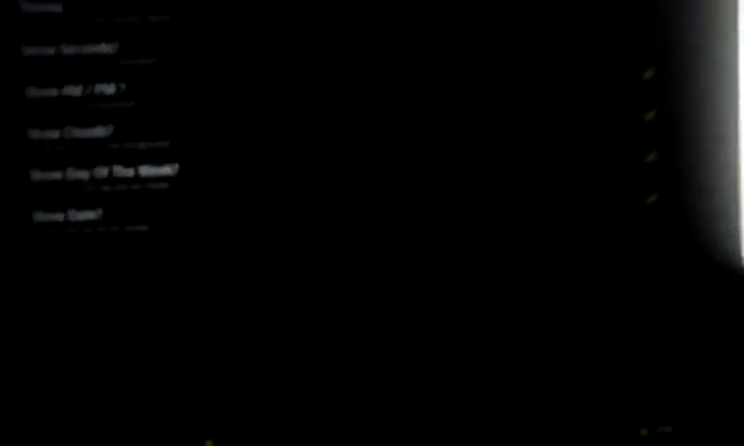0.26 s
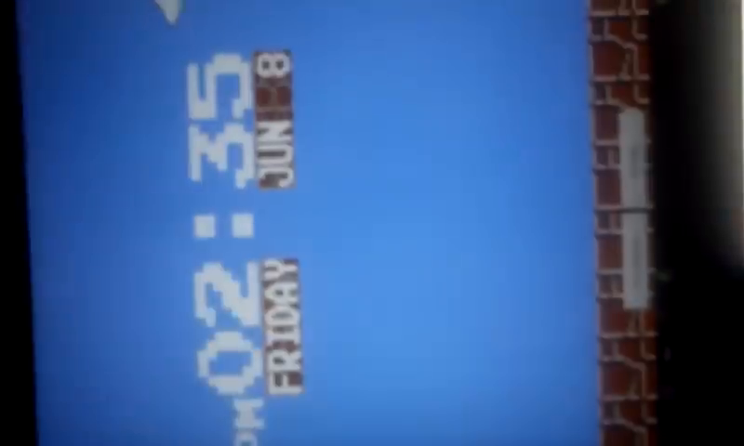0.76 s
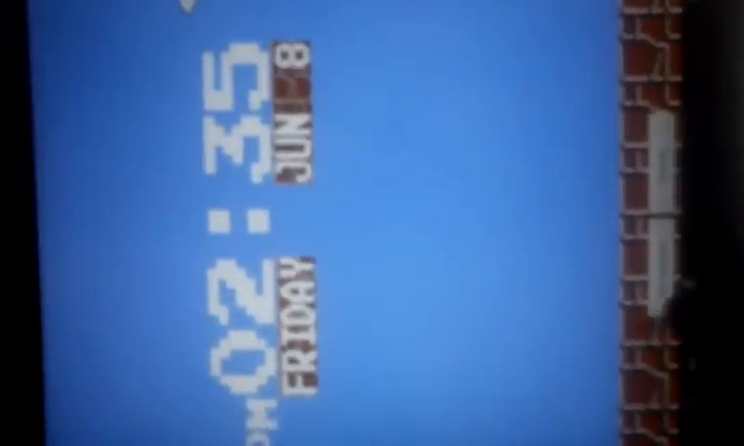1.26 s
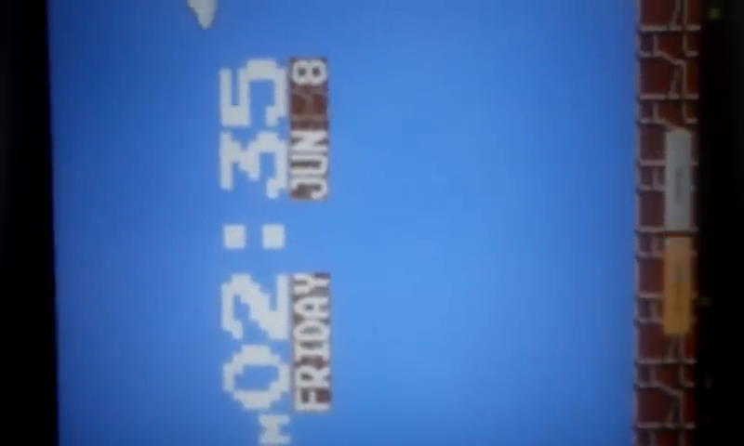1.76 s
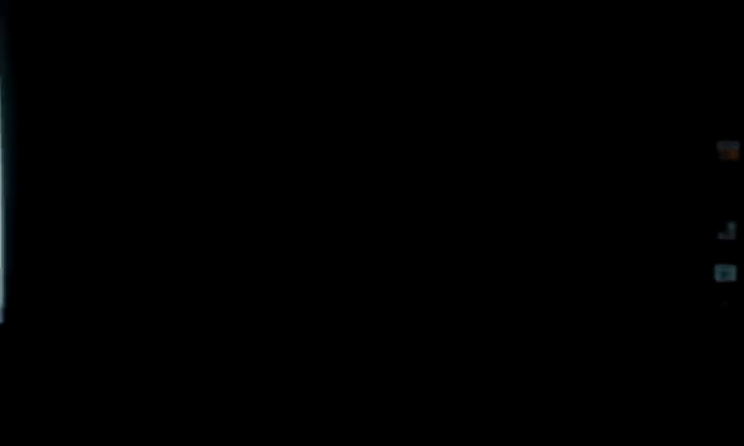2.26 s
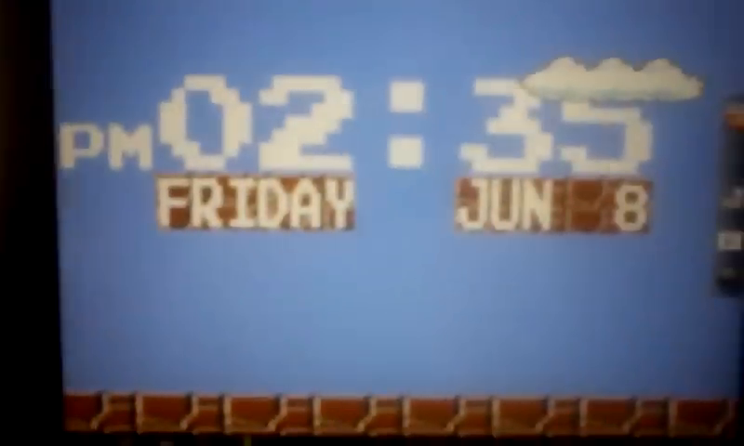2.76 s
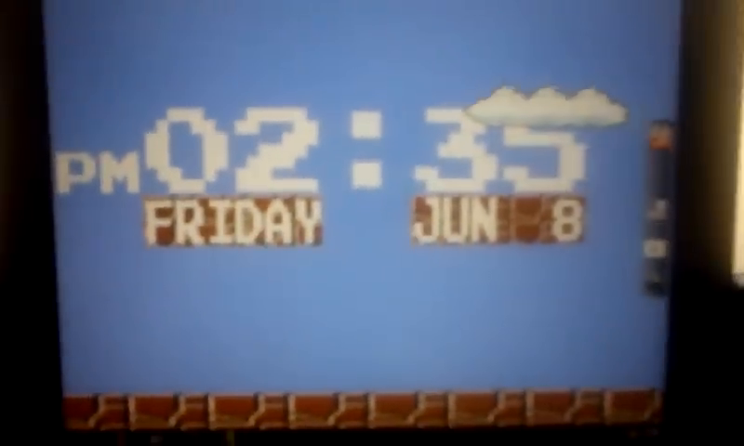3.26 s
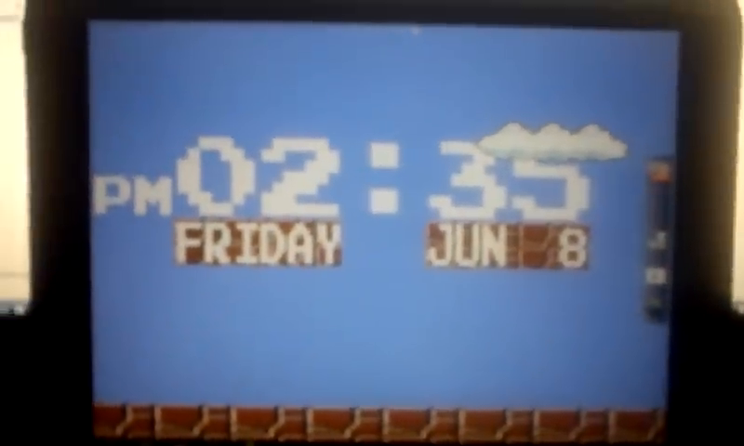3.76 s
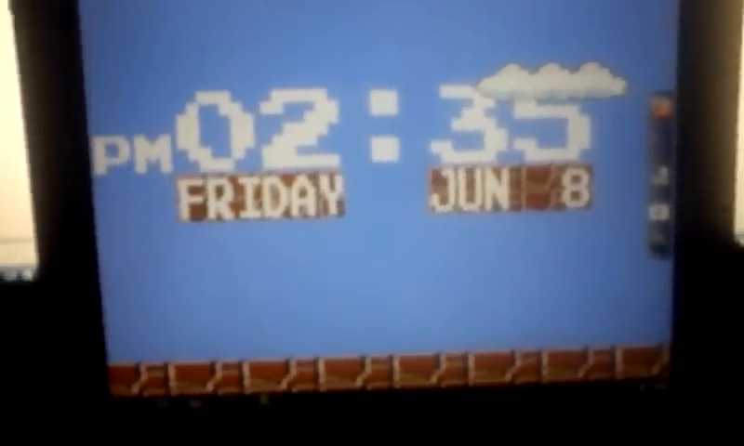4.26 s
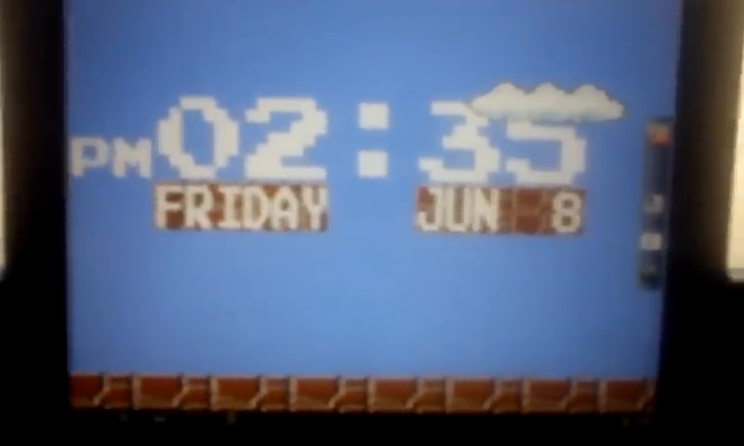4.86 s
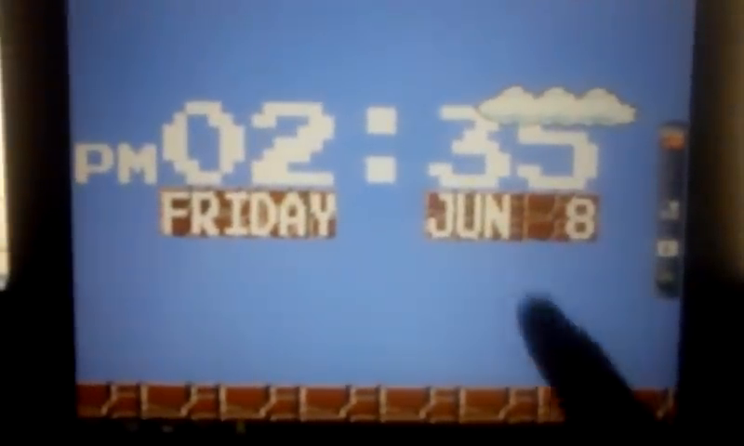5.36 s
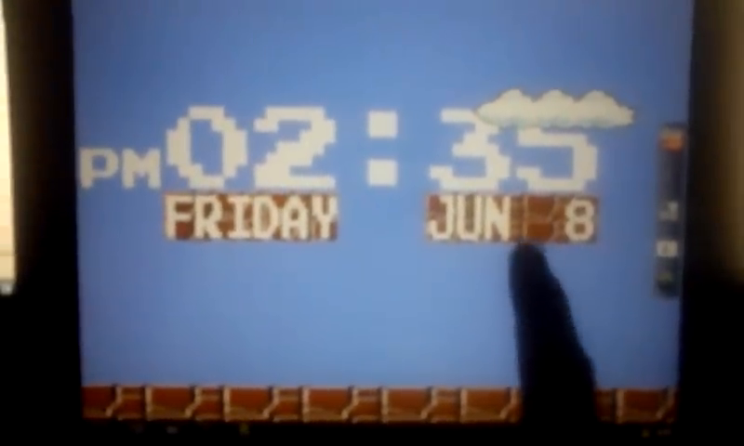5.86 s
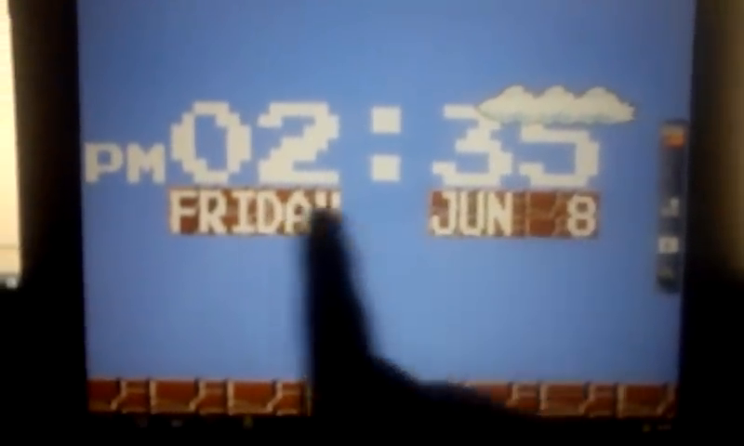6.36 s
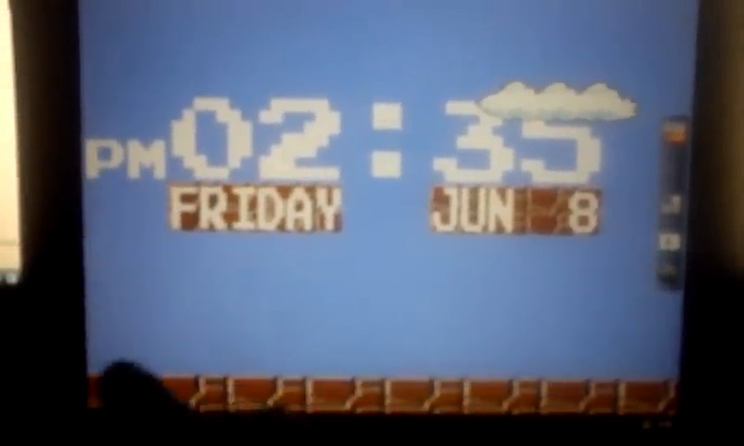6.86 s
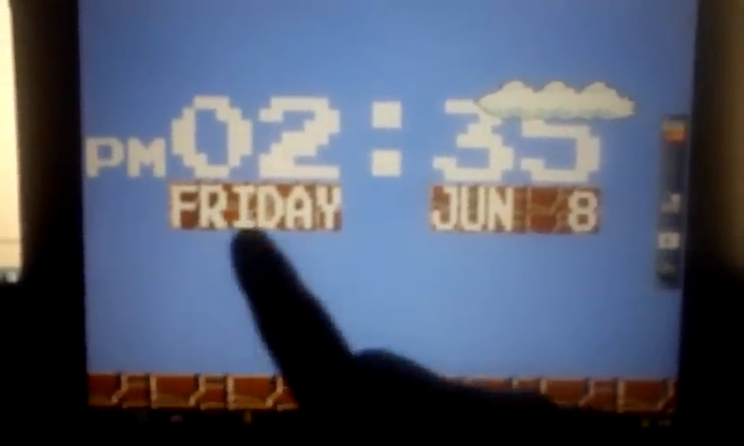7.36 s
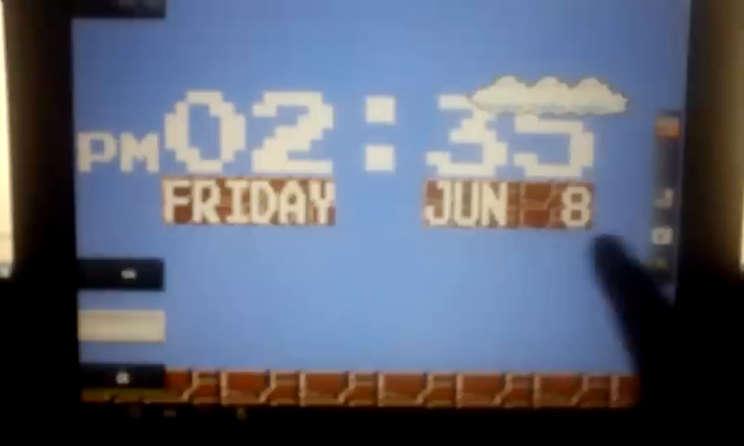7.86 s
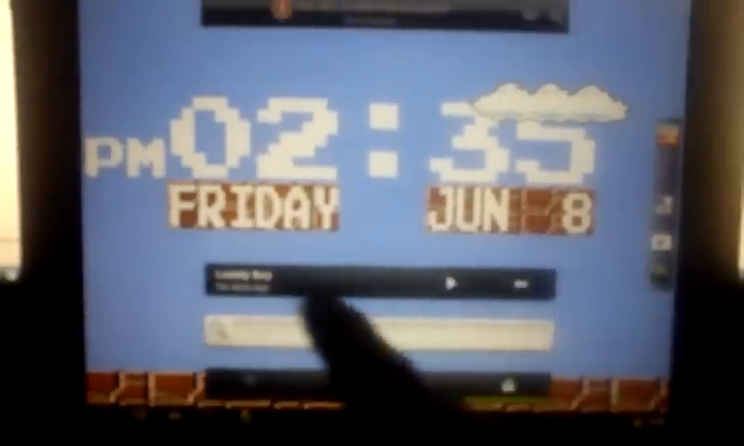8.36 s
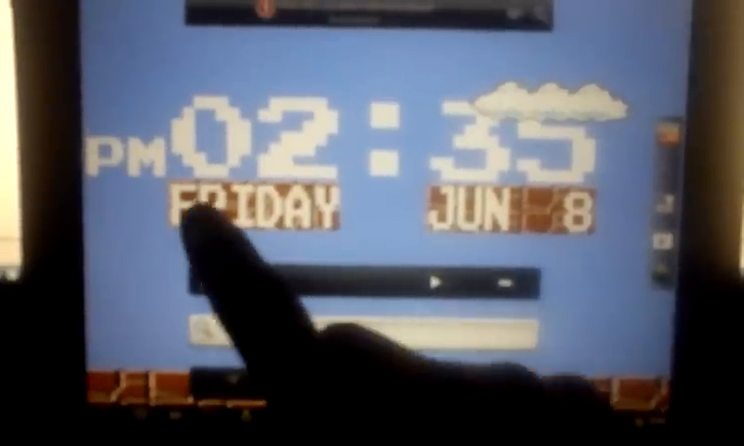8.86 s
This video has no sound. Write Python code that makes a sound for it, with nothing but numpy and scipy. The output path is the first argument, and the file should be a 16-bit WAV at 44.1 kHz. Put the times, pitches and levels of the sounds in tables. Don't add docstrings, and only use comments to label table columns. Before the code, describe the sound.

A heavy machine beyond the wall drones low and steady, slightly throbbing, with air rumble and faint hiss in a quiet room. Close to a small microphone, a hand lightly brushes plastic; around the middle the casing snaps sharply in a quick double click. Weak ticks, more rubbing and a dull tap follow. Very faint bird chirps come late. The treble is thin and slightly patchy.

```python
import sys
import numpy as np
from scipy import signal
from scipy.fft import rfft, irfft, next_fast_len
from scipy.io import wavfile
from scipy.ndimage import uniform_filter1d, map_coordinates

SR = 44100
rng = np.random.default_rng(int(sys.argv[2]) if len(sys.argv) > 2 else 0)


def attenuation_scalar(level_db):
    decades = np.asarray(level_db, float) / 20
    return 10 ** decades


def pcm_store(signal):
    levels = np.round(np.clip(np.atleast_2d(signal), -1, 1) * 32767)
    wavfile.write(sys.argv[1], SR, levels.astype(np.int16).T)


N = 402191


def unit(x):
    return x / np.sqrt(np.mean(x ** 2) + 1e-20)


def along(points, hz):
    f, v = np.transpose(points)
    return np.interp(np.log(hz + 1), np.log(f + 1), v)


def wobble(rate):
    return map_coordinates(rng.standard_normal(400), [np.arange(N) * min(rate, 40) / SR])


def filtered(x, response):
    m = next_fast_len(N + SR)
    return irfft(rfft(x, m) * response(np.fft.rfftfreq(m, 1 / SR)), m)[:N]


def modes(table):
    def response(f):
        return sum(attenuation_scalar(db) * 1j * f * width / (centre * centre - f * f + 1j * f * width)
                   for centre, width, db in table)
    return response


def noise(spectrum):
    return unit(filtered(rng.standard_normal(N), lambda hz: attenuation_scalar(along(spectrum, hz))))


def tone(hz, db):
    phase = 2 * np.pi * (np.cumsum(hz) / SR + rng.random())
    return np.sqrt(2) * attenuation_scalar(db) * np.sin(phase)


def stroke(s, length, db, rise_db_per_s, fall_db_per_s):
    t = np.arange(N) / SR - s
    rise = rise_db_per_s * np.minimum(t, 0)
    fall = fall_db_per_s * np.maximum(t - length, 0)
    return attenuation_scalar(db + rise - fall)


def machine():
    # (time [s], frequency [Hz])
    speed = [(0, 181.5), (1.15, 179.7), (1.75, 181), (2.45, 179.3), (3, 180.3), (3.75, 180.6),
             (4.85, 178.2), (5.6, 178.9), (6.2, 179.9), (7, 178.7), (8, 178.2), (9.12, 178)]
    # (multiple of the cycle rate, level [dB rms], unsteadiness [dB])
    shaft_orders = [(2, -49, 1.5), (3, -48, 1), (4, -36, .4), (5, -60, 2), (6, -45, .6), (7, -61, 2),
                    (8, -65, 1.5), (12, -58, 2), (18, -60, 2), (24, -56, 1.5), (30, -68, 2), (36, -75, 2),
                    (42, -72, 2), (48, -69, 2), (54, -71, 2)]
    # (frequency [Hz], level [dB rms], unsteadiness [dB])
    steady = [(13.5, -58, 1.5), (38.4, -52.5, 1.2), (149.1, -54, 2.5), (463.6, -67.5, 1.5), (15607, -90, 2)]
    blade_per_cycle = 24.435
    blade_db, drift_db = -43, .6
    belt_hz, belt_depth = 3.4, .11

    knot_s, knot_hz = np.transpose(speed)
    blade_hz = np.interp(np.arange(N) / SR, knot_s, knot_hz)
    hunting = 1 + 0.00294 * wobble(3.5)
    turn = 2 * np.pi * np.cumsum(blade_hz / blade_per_cycle * hunting) / SR
    orders = np.zeros(N)
    for k, db, shake in shaft_orders:
        gain = np.sqrt(2) * attenuation_scalar(db + shake * wobble(3.7))
        orders -= gain * np.cos(k * turn - k % 2 * np.pi / 2)

    belt = 1 + belt_depth * tone(belt_hz * (1 + .15 * wobble(1.2)), 2 * wobble(1.5))
    blade = belt * tone(blade_hz + .5 * wobble(10), blade_db + drift_db * wobble(4.5))
    steady_lines = sum(tone(hz * (1 + .002 * wobble(1.6)), db + shake * wobble(2.3)) for hz, db, shake in steady)
    return orders + blade + steady_lines


def casing():
    # (time [s], level [dB], part struck, rattle [0-1], rattle t60 [s], contact time [ms])
    ticks = [
        (3.5467, 1, "catch", .04, .004, .12),
        (3.5629, -16, "joint", .2, .003, .12),
        (3.5779, -15, "joint", .4, .005, .14),
        (3.59346, 1, "shell", .1, .004, .11),
        (4.49745, -16, "key", .04, .002, .18),
        (4.57435, -12.5, "key", .05, .002, .15),
        (6.4668, -21, "key", .04, .002, .6),
        (6.6088, -2.5, "pad", .01, .002, 1.2),
    ]
    parts = {"catch": [(900, 900, -10), (3000, 1500, -1), (8600, 2500, -9)], "joint": [(3800, 1200, -7),
             (5700, 1100, 0), (9600, 1400, -4), (14500, 1500, -5)], "shell": [(1250, 300, 3),
             (2400, 800, 3), (3600, 700, 6), (5800, 1300, 6), (9400, 700, 11), (12100, 1000, 3)],
             "key": [(900, 230, 9), (2450, 800, -1.5), (9500, 1500, -1)], "pad": [(480, 300, 1),
             (800, 300, -5)]}
    creak_s, creak_hold_s, creak_db = 3.568, .021, -33.5
    settle_s = 3.596
    strain_db_per_s, catch_db_per_s = 1400, 4500
    radiates_hz = 1700

    blows = {part: np.zeros(N) for part in parts}
    slips = rng.standard_normal(N) * attenuation_scalar(1.5 * rng.exponential(size=N))
    strain = stroke(creak_s, creak_hold_s, creak_db, strain_db_per_s, catch_db_per_s)
    strain += stroke(settle_s, 0, creak_db - 3, catch_db_per_s, catch_db_per_s)
    blows["joint"] += strain * np.convolve(unit(slips), [.25, .5, .25], "same")

    t = np.arange(200) / SR
    for s, db, part, rattle, t60, contact_ms in ticks:
        rebounds = rattle * rng.standard_normal(len(t)) * attenuation_scalar(-60 * t / t60)
        rebounds[0] = 1 if part in ("key", "pad") else -1
        touch = np.hanning(round(contact_ms * SR / 1000) + 2)
        blow = np.convolve(rebounds, touch / touch.sum())[:len(t)]
        blows[part][round(s * SR):][:len(t)] += attenuation_scalar(db) * blow
    blows["shell"] = filtered(blows["shell"], lambda f: (1j * f / (radiates_hz + 1j * f)) ** 2)
    return sum(filtered(blows[part], modes(parts[part])) for part in parts)


def hand():
    # (time [s], length [s], level [dB])
    strokes = [(1.006, 0.031, -68.5), (1.551, 0.0073, -71.5), (1.8, 0.018, -72), (1.941, 0.12, -66.5),
               (2.316, 0.14, -68.5), (4.303, .02, -74.5), (4.489, 0.015, -65), (4.994, 0.12, -62),
               (5.342, 0.046, -66.5), (5.493, 0.048, -69.5), (6.283, .03, -73), (6.381, 0.18, -67)]
    # (frequency [Hz], density [dB per Hz])
    skin = [(900, -19.5), (1700, 5.5), (2800, 5.5), (4000, 3.5), (6000, 1.5), (8000, -1.5), (10000, 5),
            (11500, -10), (14000, -39.5)]
    touch_db_per_s, lift_db_per_s = 167, 147.5
    grain_db = 2.2 * wobble(35)
    pressure = sum(stroke(*row, touch_db_per_s, lift_db_per_s) for row in strokes)
    return pressure * attenuation_scalar(grain_db) * noise(skin)


def air():
    # (frequency
    # [Hz], width [Hz], level [dB rms])
    duct = [(14.1, 4.5, -56.5), (201, 6.1, -69), (111.2, 17, -54.5), (138.7, 14, -54), (177.9, 15, -60),
            (215.5, 9.4, -69), (311.6, 11, -66), (352.1, 8.3, -68), (396.7, 7.5, -69), (469.5, 17, -69.5)]
    # (frequency [Hz], density [dB per Hz])
    rumble_spectrum = [(8, -22), (14, 2), (45, -2.5), (70, -1), (150, -4.5), (195, -11), (300, -11),
                       (480, -17.5), (700, -30.5), (1400, -79.5)]
    # (frequency [Hz], density [dB per Hz])
    hiss_spectrum = [(300, -5), (600, 7), (1000, 4), (1800, 3.5), (2600, -5), (3500, -3.5), (4500, -9),
                     (7000, -13), (11000, -23), (14300, -13.5), (15700, -13.5)]
    rumble_db, hiss_db = -49, -60

    ducts = np.zeros(N)
    for centre, width, db in duct:
        resonance = modes([(centre, width, 0)])
        band = filtered(rng.standard_normal(N), lambda f: resonance(f) ** 2)
        ducts += attenuation_scalar(db) * unit(band)
    rumble = attenuation_scalar(rumble_db + 0.2 * wobble(7.6) + 1.7 * wobble(.9)) * noise(rumble_spectrum)
    hiss = attenuation_scalar(hiss_db + 0.42 * wobble(4.8)) * noise(hiss_spectrum)
    return ducts + rumble + hiss


def bird():
    # (time [s], length [s], start frequency [Hz], end frequency [Hz], level [dB])
    chirps = [
        (7.161, .085, 4040, 3970, -69),
        (7.435, .1, 4000, 3900, -72.5),
        (7.705, .06, 5790, 5930, -75),
        (7.95, .06, 5800, 5900, -79),
    ]
    t = np.arange(N) / SR
    out = np.zeros(N)
    for s, length, from_hz, to_hz, db in chirps:
        u = np.clip((t - s) / length, 0, 1)
        swell = np.sqrt(np.abs(np.sin(np.pi * u))) * (u < 1)
        pitch = from_hz + (to_hz - from_hz) * u + 20 * wobble(40)
        out += swell * tone(pitch, db + 2.5 * wobble(40))
    return out


def starved(x):
    # (frequency [Hz], margin [dB])
    band_margin = [(1500, 60), (4050, 11), (4400, 4.5), (5100, 2.5), (6500, 1.5), (7800, 0), (8600, -2.5),
                   (9800, -3), (11500, -4.5), (13000, -4.5), (14200, -2.5), (15300, 1)]
    usual_db, broke_db, broke_share = -1.31, 6.5, .16
    masking = 0.36
    borrow, debt = 0.29, 0.39

    frame = dict(window=signal.windows.kaiser_bessel_derived(2048, 4 * np.pi), nperseg=2048, noverlap=1024)
    hz, t, z = signal.stft(x, SR, **frame)
    edges = np.r_[0:192:16, 192:1024:32]
    band = np.searchsorted(edges, np.arange(len(hz)), "right") - 1
    power = np.array([np.mean(np.abs(z[band == b]) ** 2, 0) for b in range(len(edges))])
    level = 10 * np.log10(power + 1e-20)
    excess = level - np.median(level, 1)[:, None]

    broke = uniform_filter1d(rng.random(len(t)), size=2) < np.sqrt(broke_share / 2)
    spare = usual_db - broke_db * broke
    spare += np.minimum(3.5 * rng.standard_normal(len(t)), 4.5)
    loud = np.maximum(np.median(excess, axis=0), 0)
    spare += borrow * loud - debt * np.roll(loud, 2)
    own = uniform_filter1d(rng.standard_normal(level.shape), size=2, axis=1) * 3.5
    margin = along(band_margin, hz[edges] + 250)[:, None]
    kept = (1 - masking) * excess + spare + own + margin > 0
    gain = np.where(kept, 1, attenuation_scalar(-45.5))
    return signal.istft(z * gain[band], SR, **frame)[1][:N]


def scene():
    return (machine() + casing() + hand() + air() + bird())[None]


def band_limit(x):
    return signal.sosfilt(signal.butter(12, 16100, fs=SR, output="sos"), x)


def record(dry):
    limited = filtered(dry[0], lambda hz: hz < 15850)
    mix = starved(limited)[None]
    return band_limit(mix)


dry = scene()
out = record(dry)
pcm_store(out)
```